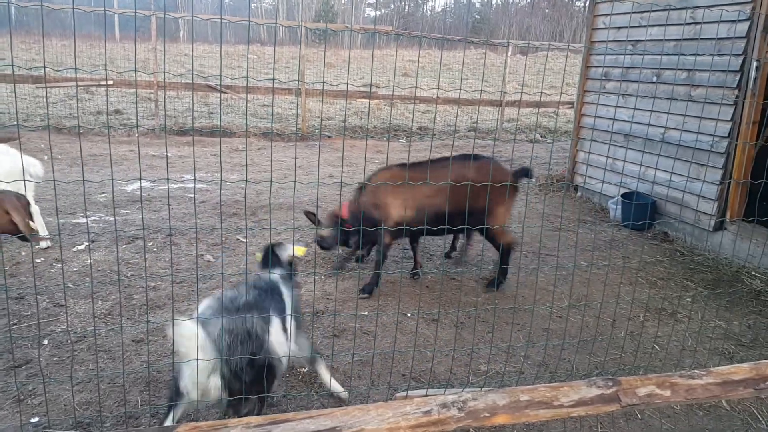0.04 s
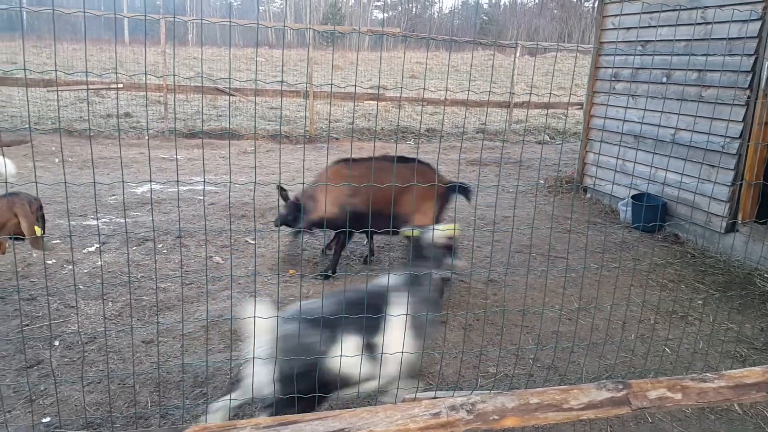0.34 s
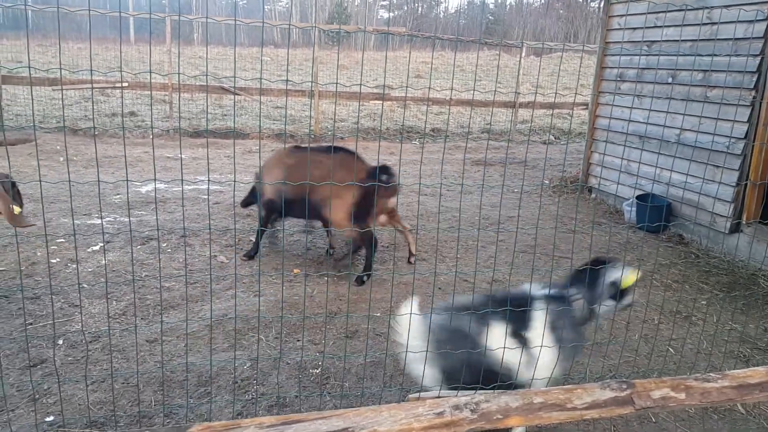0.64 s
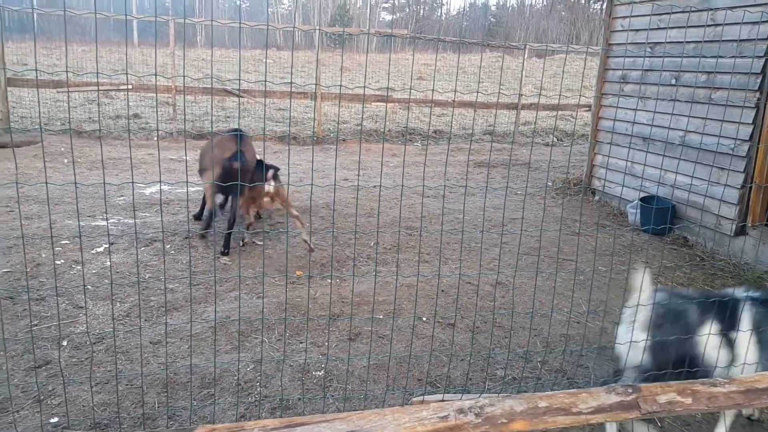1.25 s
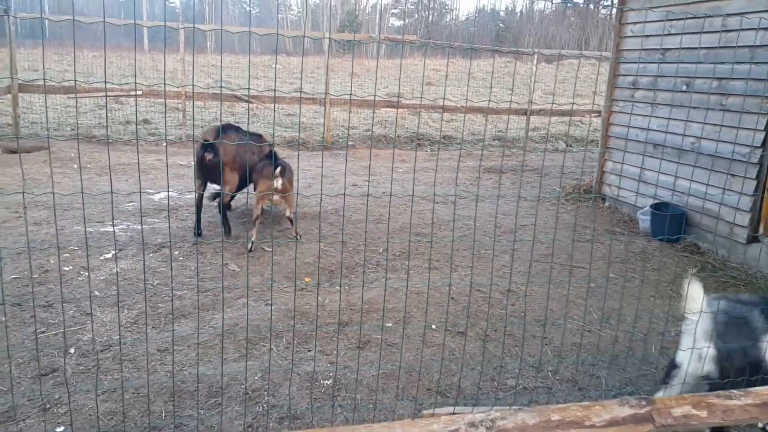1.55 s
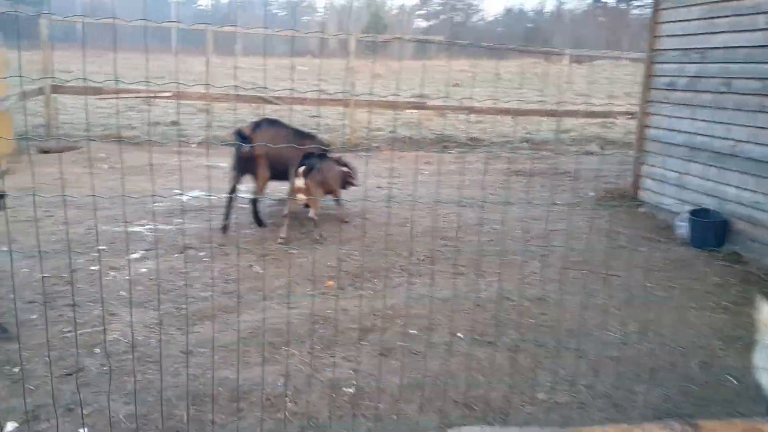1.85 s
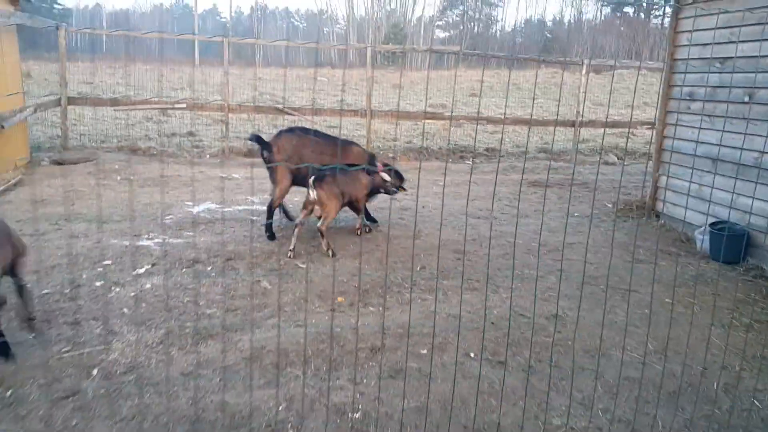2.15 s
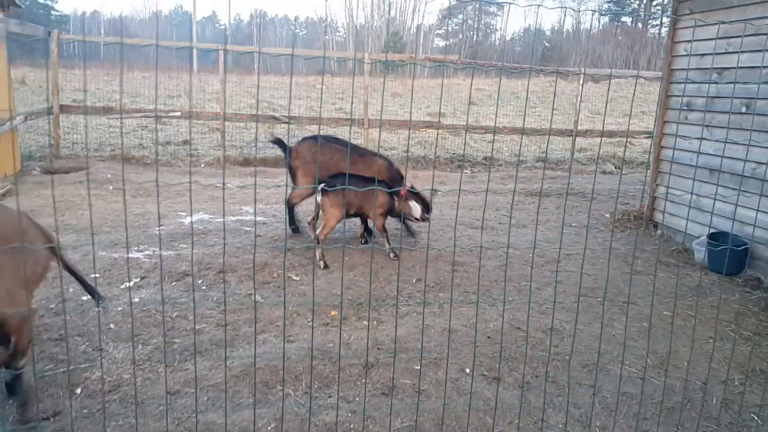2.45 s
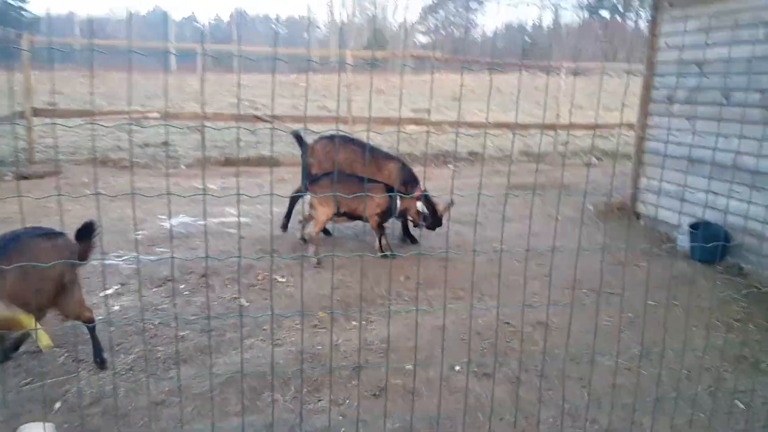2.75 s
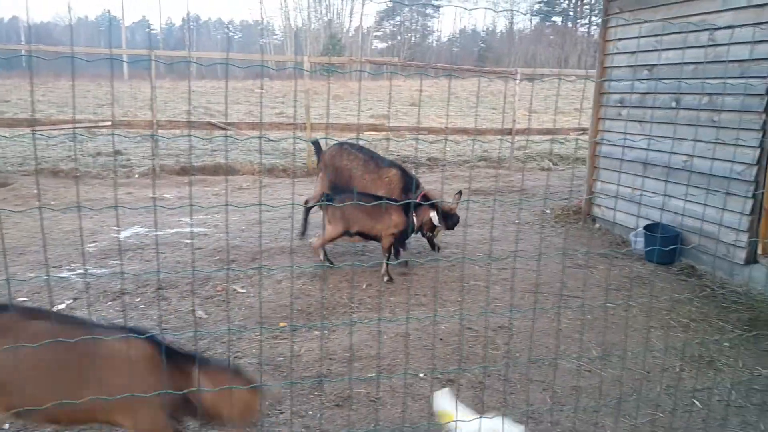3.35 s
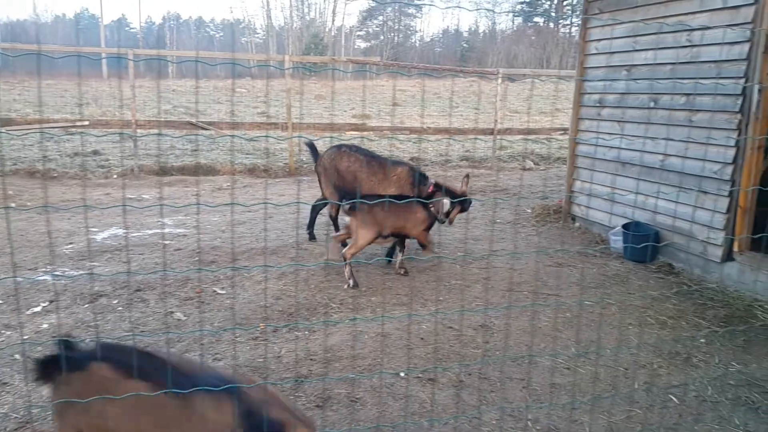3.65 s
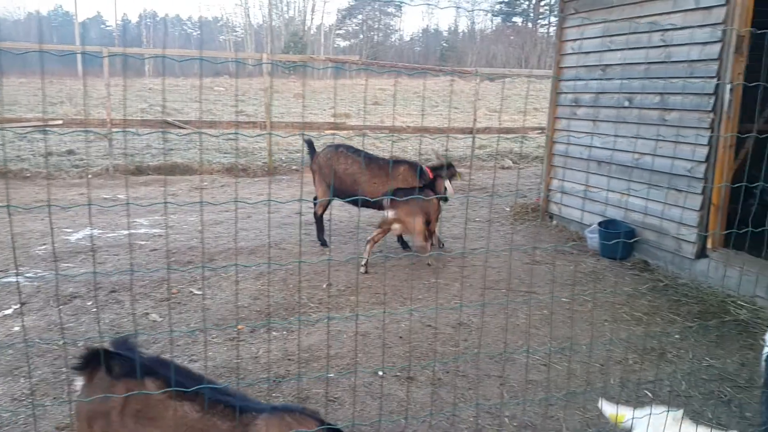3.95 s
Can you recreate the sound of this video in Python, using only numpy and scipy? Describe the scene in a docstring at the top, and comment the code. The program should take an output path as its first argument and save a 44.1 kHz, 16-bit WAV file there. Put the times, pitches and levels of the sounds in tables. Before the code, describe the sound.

Goat hooves thud and knock unevenly on the packed dirt of an outdoor pen, scuffing soil and cracking grit. One hoof skids, then the steps grow loud as a goat passes close to the microphone. The herd shuffles faintly.

```python
"""Dull thuds and hollow knocks of hooves: goats trot about a pen of packed dirt beside a plank shed.
The hooves crack bits of grit, scuff through loose soil and snap dry litter; one drags and skids hard.
Towards the end the steps grow loud as one goat passes close by. The rest of the herd shuffles faintly.
The shed throws back a short reflection of the blows, and quiet open air lies underneath."""
import sys
import numpy as np
from scipy import signal
from scipy.fft import rfft, irfft
from scipy.io import wavfile

SR = 44100
rng = np.random.default_rng(int(sys.argv[2]) if len(sys.argv) > 2 else 0)


def dump(signal):
    """Clip the signal to [-1, 1] and save it as 16-bit WAV at the path in sys.argv[1]."""
    limited = np.clip(np.atleast_2d(signal).T, -1, 1)
    pcm = np.round(limited * 32767).astype(np.int16)
    wavfile.write(sys.argv[1], SR, pcm)


N = 176400
TIME = np.arange(N) / SR
FREQS = np.maximum(np.arange(N // 2 + 1) * SR / N, 1)
LEFT_RIGHT = np.array([[.5], [-.5]])

# Hoof falls: start_s, level_db, pitch_hz
HOOF_FALLS = [(0.01, -38, 313), (0.098, -38, 260.0), (0.198, -40, 310.0), (0.238, -39, 287),
              (0.3425, -32.5, 290), (0.486, -42.5, 435), (0.615, -33.5, 285), (0.824, -34.5, 272),
              (0.883, -33.5, 313), (0.975, -34.5, 480), (1.362, -36, 274), (1.425, -38, 300),
              (1.534, -33.5, 245), (1.881, -33, 320), (2.211, -38, 230.0), (2.365, -33.5, 298),
              (2.415, -36.5, 303), (2.546, -35.5, 258), (2.610, -35, 260.0), (2.655, -33, 348),
              (2.876, -27, 700), (2.893, -32.5, 298), (3.043, -35, 440.0), (3.266, -34, 433),
              (3.464, -27, 288), (3.5017, -22.5, 600), (3.529, -26, 450), (3.663, -24, 310),
              (3.7023, -22.5, 370), (3.744, -29, 600.0), (3.8284, -20.5, 370)]
# Settling soil: freq_hz, gain_db
SOIL_SPECTRUM = [(60, -9), (130, 3), (330, 1.5), (700, -17), (6000, -45)]

def thuds():
    """A hoof strikes the ground, which rings a little lower; the soil settles with a brief rumble."""
    ring_db, ring_ratio, ring_decay_s = -24, .8, .012
    rumble_db, rumble_decay_s = -30, .014
    out, settling, t = np.zeros(N), np.zeros(N), TIME[:SR // 10]
    for start_s, level_db, pitch_hz in HOOF_FALLS:
        push = -t * np.exp(-4 * np.pi * pitch_hz * t)
        blow = high_pass(resonate(push, pitch_hz, q=1.07), hz=122)
        ring_envelope = np.exp(-t / ring_decay_s) * (1 - np.exp(-pitch_hz * t))
        ring = -np.sin(2 * np.pi * ring_ratio * pitch_hz * t) * ring_envelope
        ground_db = .55 * level_db   # ring and rumble grow more slowly than the blow
        add(out, start_s, from_db(level_db) * blow / abs(blow).max())
        add(out, start_s, from_db(ring_db + ground_db) * ring)
        add(settling, start_s, from_db(rumble_db + ground_db) * np.exp(-t / rumble_decay_s))
    return out + colour(settling * rng.standard_normal((2, N)), SOIL_SPECTRUM)


# Flat landings: start_s, level_db, pitch_hz
FLAT_LANDINGS = [(0.525, -44, 190), (0.606, -41, 240), (0.731, -41, 165), (0.897, -42, 205),
                 (1.105, -45, 215), (1.214, -43.5, 230), (1.786, -43, 620), (1.838, -44, 210),
                 (1.869, -40, 220), (2.023, -41, 245), (2.117, -44, 640), (2.1835, -30, 255),
                 (3.456, -33.5, 680), (3.656, -28, 720)]
# Crushed soil: freq_hz, gain_db
CRUNCH_SPECTRUM = [(90, -12), (180, 0), (750, -8), (3000, -24)]

def knocks():
    """A flat hoof cups the ground: a hollow note swells and sags in pitch while soil crunches."""
    sag_octaves_per_s, crunch_db = 16, -14.5
    notes, crushing, t = np.zeros(N), np.zeros(N), TIME[:SR // 10]
    for start_s, level_db, pitch_hz in FLAT_LANDINGS:
        rise_s = 1 / pitch_hz
        glide_hz = pitch_hz * 2 ** (-sag_octaves_per_s * (t - rise_s))
        press = t / rise_s * np.exp(1 - t / rise_s)
        tone = np.sin(2 * np.pi * np.cumsum(glide_hz) / SR)
        add(notes, start_s, from_db(level_db) * press ** 2 * tone)
        add(crushing, start_s, from_db(level_db + crunch_db) * np.sqrt(press))
    return notes + colour(crushing * grains(), CRUNCH_SPECTRUM)


# Grit breaking under a hoof: start_s, level_db, pitch_hz
GRIT_CRACKS = [(0.198, -33, 2500), (0.227, -41, 2600), (0.737, -38, 4360), (0.797, -33.5, 3000),
               (1.361, -40, 4710.0), (2.19, -36.5, 3290.0), (2.389, -35, 3770), (2.542, -39.5, 4240),
               (2.847, -32, 3900), (3.011, -38, 3550.0), (3.424, -24, 3400), (3.4325, -23, 3300),
               (3.474, -27, 5500), (3.5017, -25, 2700), (3.605, -30.5, 2800), (3.663, -21, 4000),
               (3.703, -29, 3070.0), (3.74, -23, 2800), (3.744, -18.5, 2550), (3.829, -27, 2700),
               (3.8803, -16.5, 2900), (3.881, -24, 6300), (3.924, -19, 2800), (3.927, -20, 4500)]

def cracks():
    """Grit breaks in a short burst; the harder the break, the more the chip rings at its own pitch."""
    decay_s, width, chip_db, trim_db, pan_db = .0019, .6, 23, .8, -1.5
    out, t = np.zeros((2, N)), TIME[:SR // 20]
    for start_s, level_db, pitch_hz in GRIT_CRACKS:
        mid, side = rng.standard_normal((2, len(t))) * np.exp(-t / decay_s)
        burst = resonate(mid + width * np.array([side, -side]), pitch_hz, q=1.8)
        crack = burst + from_db(chip_db + level_db) * resonate(burst, pitch_hz, q=5)
        add(out, start_s, from_db(level_db + trim_db) * crack / abs(crack).max())
    return out * from_db(pan_db * LEFT_RIGHT)


# Hooves in loose soil: peak_s, decay_s, level_db, tilt_db_per_octave
HOOF_SCUFFS = [(0.013, 0.012, -47, 0), (0.101, 0.016, -53, -2.5), (.232, 0.022, -51, -2),
               (0.48, 0.009, -52, -4), (.615, 0.016, -49.5, -2), (0.741, 0.012, -49.5, 0),
               (.797, 0.014, -44, -1.5), (0.906, 0.024, -50, .5), (0.974, 0.012, -53, -3),
               (1.376, .02, -45, 1), (1.56, 0.07, -52, -2.5), (1.657, .022, -45, -2.8),
               (1.875, 0.016, -50.5, -3), (2.039, 0.032, -52, -2.5), (2.406, 0.021, -48, -1.5),
               (2.682, 0.05, -45.5, 1.5), (2.856, 0.035, -41.3, -0.5), (3.047, 0.057, -49.5, -3.5),
               (3.303, 0.033, -44.5, 0), (3.434, .026, -35.5, 0), (3.468, 0.013, -39.5, 0),
               (3.666, 0.013, -39, 0.5), (3.745, 0.0065, -32, 0), (3.88, 0.021, -35, -0.3),
               (3.928, 0.008, -29.5, 0), (3.94, 0.03, -40.5, -2)]
# Loose grit: freq_hz, gain_db
GRIT_SPECTRUM = [(150, -11), (700, 1), (1700, -0.5), (3000, -2.5), (6500, -2), (9000, -6)]

def scuffs():
    """Loose grains grind in clumps under each hoof; their colour shifts from moment to moment."""
    clump_db, flicker_db, trim_db, pan_db = 2.2, 2.5, -1.15, -2
    rise_ratio, pivot_hz = .58, 3000
    clumps = grains() * from_db(clump_db * drift(rate_hz=450))
    grinding = rfft(colour(clumps, GRIT_SPECTRUM))
    pressures = np.array([swell(peak_s, rise_ratio * decay_s, decay_s, level_db)
                          for peak_s, decay_s, level_db, _ in HOOF_SCUFFS])
    tilt_db_per_octave = np.array(HOOF_SCUFFS)[:, 3]
    octaves = np.clip(np.round(2 * np.log2(FREQS / pivot_hz)) / 2, -2.5, 2)   # half-octave bands
    out = 0
    for octave in np.unique(octaves):
        band = irfft(grinding * (octaves == octave), N)
        envelope = np.sqrt(from_db(tilt_db_per_octave * octave) ** 2 @ pressures ** 2)
        out += band * envelope * from_db(flicker_db * drift(rate_hz=50))
    return out * from_db(trim_db + pan_db * LEFT_RIGHT)


# Hoof rasping on hard ground: freq_hz, gain_db
RASP_SPECTRUM = [(60, -13), (160, -3.5), (350, 1.5), (750, 0), (1800, -10.5), (2800, -19), (8000, -38)]

def skid():
    """A hoof drags through sand with a thin hiss and judders over hard ground in a short, low rasp."""
    sand = rms_one(resonate(grains(), hz=6200, q=3))
    hiss = sand * stroke(start_s=2.63, end_s=2.715, fade_s=.025, level_db=-53)
    judder = grains() * stroke(start_s=2.692, end_s=2.72, fade_s=.005, level_db=-33.3)
    return hiss + colour(judder, RASP_SPECTRUM)


# Dry litter: peak_s, level_db
LITTER_SNAPS = [(0.43, -40), (0.616, -34), (.692, -41), (.784, -43), (.907, -40), (2.73, -38), (2.808, -38),
                (2.854, -33), (2.912, -39), (3.314, -38)]

def ticks():
    """Dry litter snaps, high and thin."""
    snaps = sum(swell(peak_s, rise_s=.0003, decay_s=.003, level_db=db) for peak_s, db in LITTER_SNAPS)
    return high_pass(snaps * rng.standard_normal((2, N)), hz=7500)


# Rest of the herd: time_s, level_db
HERD_LEVEL = [(0, -62), (.9, -58), (1.08, -64), (1.5, -58), (1.95, -59.5), (2.7, -54), (3.15, -53.5),
              (3.58, -52), (3.8, -51.5)]
# Patter of its feet: freq_hz, gain_db
PATTER_SPECTRUM = [(60, -11), (130, -1), (200, 2), (330, -4.5), (750, -7), (1200, -13), (3000, -20.5),
                   (15000, -22)]

def shuffle():
    """Fainter feet make a restless patter and kick single crumbs loose."""
    flicker_db, crumbs_per_s, crumb_db = 2.3, 22, 21
    level_db = np.interp(TIME, *np.transpose(HERD_LEVEL))
    envelope = from_db(level_db + flicker_db * drift(rate_hz=55))
    patter = colour(grains() * envelope, PATTER_SPECTRUM)
    crumbs = (rng.random(N) < crumbs_per_s / SR) * rng.uniform(-1, 1, (2, N))
    return patter + colour(crumbs * from_db(level_db + crumb_db), GRIT_SPECTRUM)


# Reflected sound: freq_hz, gain_db
SHED_SPECTRUM = [(200, 1.5), (1000, -5), (8000, -4.5)]

def reflections(blows):
    """Shed wall and fence scatter a short tail."""
    envelope = swell(peak_s=.0049, rise_s=.00049, decay_s=.02, level_db=0)
    scatter = rms_one(rng.standard_normal((2, N)) * envelope) / np.sqrt(N)
    tail = colour(scatter, SHED_SPECTRUM)[:, :SR // 4]
    return from_db(-14.5) * signal.fftconvolve(blows, tail, axes=1)[:, :N]


# Open air: freq_hz, gain_db
AIR_SPECTRUM = [(46, -14), (61, 7.5), (76, -8.5), (170, -2.5), (400, -10.5), (1200, -16.5), (2100, -15.5),
                (2900, -28), (9500, -24.5), (15000, -17.5)]

def open_air():
    """A steady low rumble with a faint hiss."""
    return from_db(-59.5) * colour(rng.standard_normal((2, N)), AIR_SPECTRUM)


# Left-right likeness: freq_hz, correlation
STEREO_CORRELATION = [(40, 0.76), (150, 0.94), (350, 0.87), (700, 0.35), (1300, 0), (2500, 0.28), (5000, 0)]

def colour(pair, spectrum):
    """Two unrelated signals become a stereo sound with this spectrum, at about the same power."""
    correlation = at_freqs(STEREO_CORRELATION)
    gain = rms_one(from_db(at_freqs(spectrum)))
    mid, side = rfft(pair) * gain * np.sqrt([1 + correlation, 1 - correlation])
    return irfft([mid + side, mid - side], N)


def grains(rate_hz=3500, spread_db=3.5):
    """Two channels of dense clicks of uneven size, at unit power."""
    sizes = from_db(spread_db * np.minimum(rng.exponential(1, (2, N)), 4))
    signs = rng.choice([-1, 1], (2, N))
    return rms_one(sizes * signs * (rng.random((2, N)) < rate_hz / SR))


def drift(rate_hz):
    """Random wander at unit power."""
    return rms_one(np.interp(TIME * rate_hz, np.arange(2000), rng.standard_normal(2000)))


def swell(peak_s, rise_s, decay_s, level_db):
    """Exponential rise to a peak, then exponential decay."""
    out = np.zeros(N)
    span = slice(*np.searchsorted(TIME, [peak_s - 10 * rise_s, peak_s + 10 * decay_s]))
    t = TIME[span] - peak_s
    out[span] = from_db(level_db) * np.exp(-np.maximum(-t / rise_s, t / decay_s))
    return out


def stroke(start_s, end_s, fade_s, level_db):
    """A held level, fading on both sides."""
    outside_s = abs(TIME - np.clip(TIME, start_s, end_s))
    return from_db(level_db) * np.exp(-outside_s / fade_s)


def resonate(x, hz, q):
    """Two-pole band-pass."""
    angle = 2 * np.pi * hz / SR
    damping = np.sin(angle) / (2 * q)
    poles = [1 + damping, -2 * np.cos(angle), 1 - damping]
    return signal.lfilter([damping, 0, -damping], poles, x + 1e-18)


def high_pass(x, hz):
    """Second-order low cut."""
    return signal.sosfilt(signal.butter(2, hz, "high", fs=SR, output="sos"), x)


def add(out, start_s, sound):
    """Mix a sound in at a time."""
    i = int(start_s * SR)
    out[..., i:i + sound.shape[-1]] += sound[..., :max(N - i, 0)]


def at_freqs(points):
    """A curve interpolated over log frequency."""
    hz, value = np.transpose(points)
    return np.interp(np.log(FREQS), np.log(hz), value)


def from_db(db):
    """Decibels to gain."""
    return 10 ** (np.asarray(db) / 20)


def rms_one(x):
    """Scale to unit power."""
    return x / np.sqrt(np.mean(x ** 2) + 1e-20)


def scene():
    """Hooves, their reflections, the herd and the open air."""
    blows = thuds() + knocks() + cracks()
    air = open_air()
    return blows + reflections(blows) + scuffs() + skid() + ticks() + shuffle() + air


# Microphone: freq_hz, gain_db
MICROPHONE_RESPONSE = [(25, -12), (60, 1), (390, -0.5), (470, -5.5), (620, 1.5), (1250, 0), (1500, 1.5),
                       (2700, 0), (6700, -0.5), (7600, -11)]

def record(dry):
    """The microphone colours the sound, and the very top is cut."""
    cutoff_hz = 15900
    coloured = irfft(rfft(dry) * from_db(at_freqs(MICROPHONE_RESPONSE)), N)
    return signal.sosfilt(signal.ellip(12, .1, 70, cutoff_hz, fs=SR, output="sos"), coloured)


dry = scene()
out = record(dry)
dump(out)
```